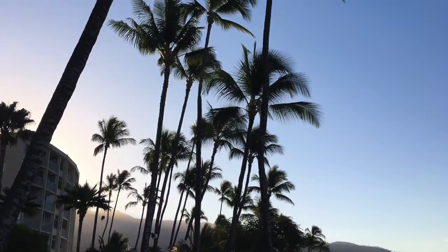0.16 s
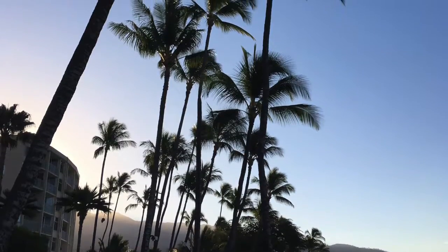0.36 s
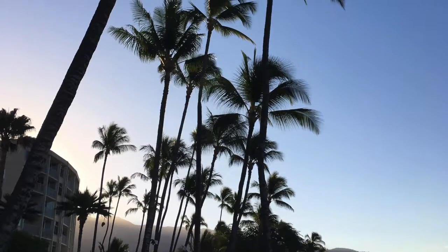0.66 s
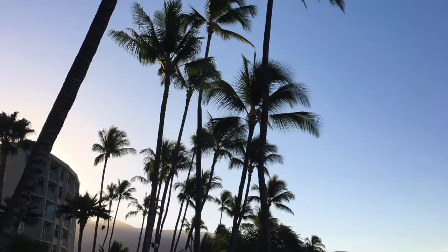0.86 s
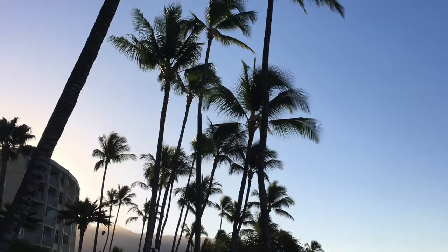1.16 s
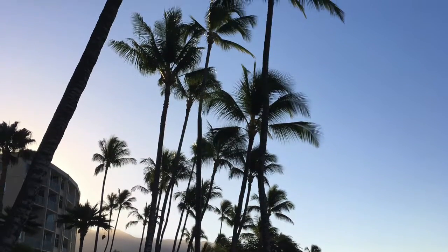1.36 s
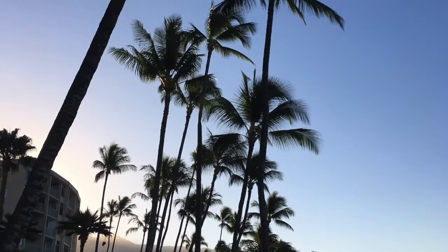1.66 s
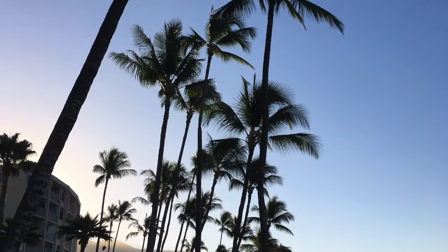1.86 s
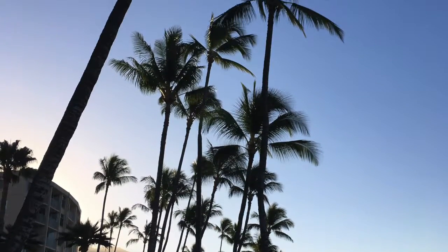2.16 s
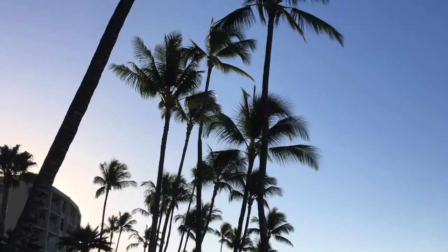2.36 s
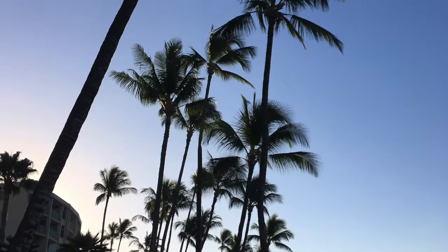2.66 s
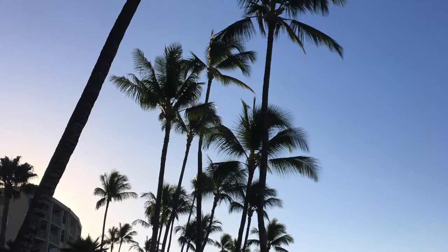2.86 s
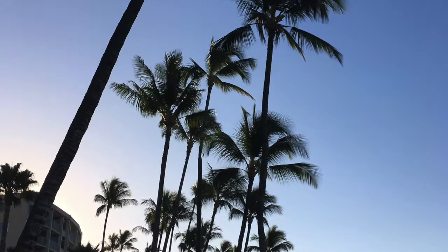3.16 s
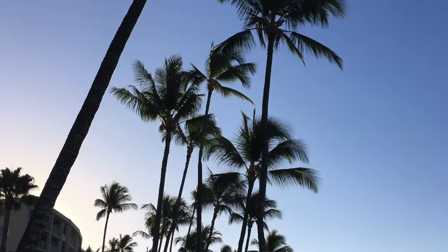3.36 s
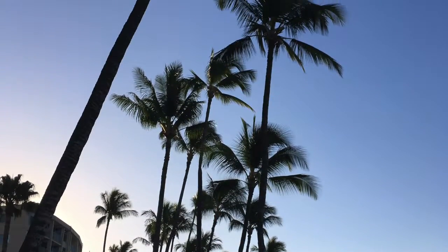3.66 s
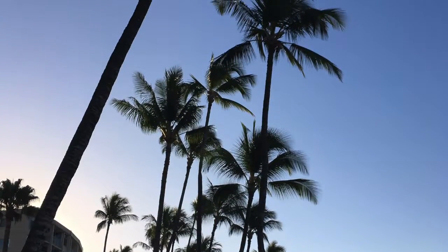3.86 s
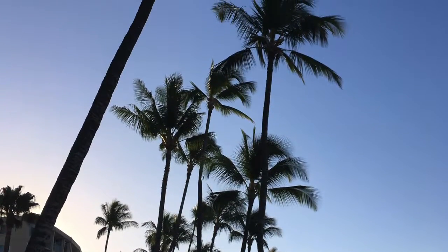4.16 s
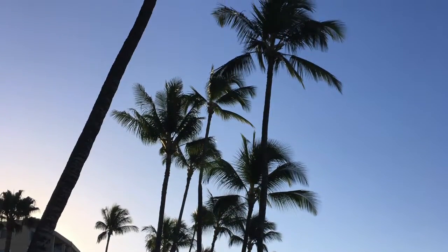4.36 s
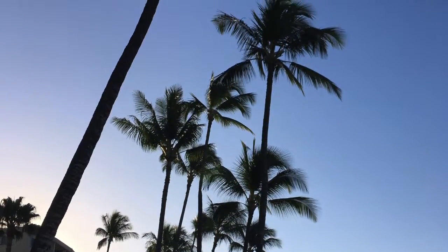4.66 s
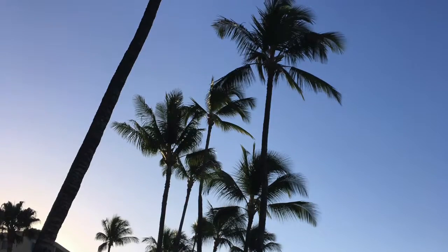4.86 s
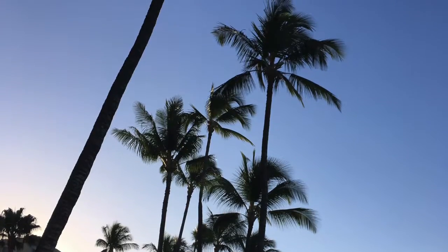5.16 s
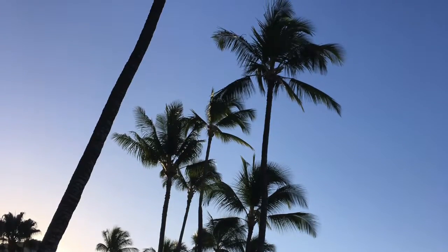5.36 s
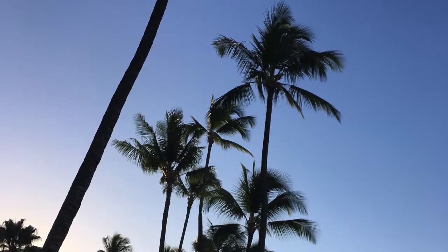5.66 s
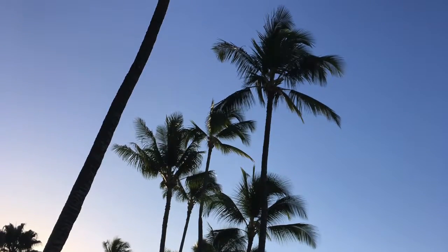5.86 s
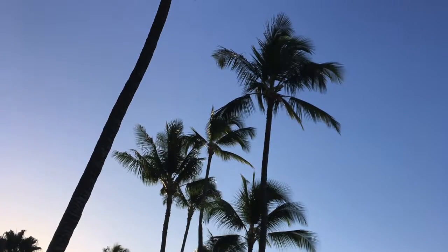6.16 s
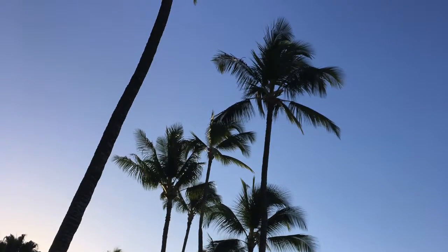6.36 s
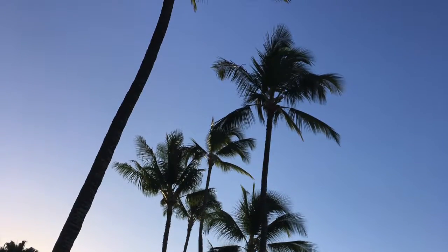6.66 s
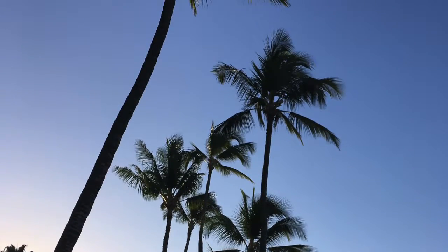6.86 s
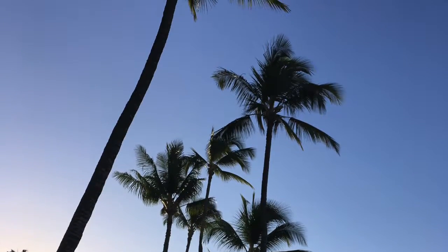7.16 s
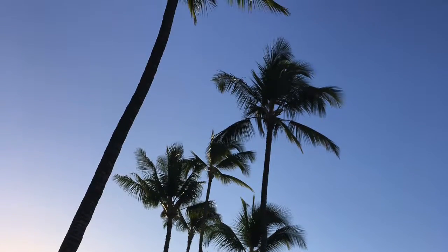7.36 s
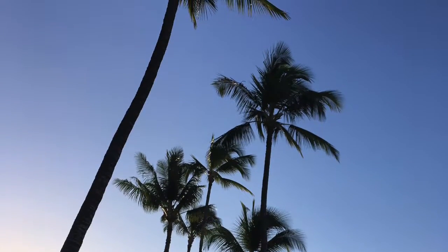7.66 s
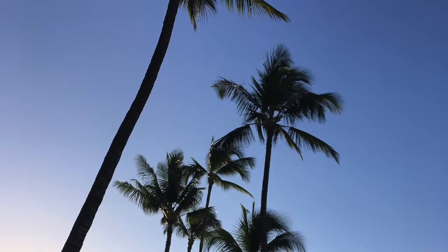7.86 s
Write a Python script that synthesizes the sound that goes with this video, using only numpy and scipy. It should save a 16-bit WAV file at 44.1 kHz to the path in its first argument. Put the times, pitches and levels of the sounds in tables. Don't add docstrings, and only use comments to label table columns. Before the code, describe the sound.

Dense dawn chorus of many small birds chirping, whistling and scolding in overlapping bursts outdoors, over faint low hum and wash, fading out at the end.

```python
import sys
import numpy as np
from scipy import signal
from scipy.io import wavfile
from scipy.ndimage import uniform_filter1d

SR = 44100
rng = np.random.default_rng(int(sys.argv[2]) if len(sys.argv) > 2 else 0)


def field_ratio(decibels):
    return 10 ** (np.asarray(decibels, dtype=float) / 20)


def wav_record(signal):
    frames = np.transpose(np.atleast_2d(signal))
    bounded = np.clip(frames, -1, 1)
    quanta = np.round(bounded * 32767).astype(np.int16)
    wavfile.write(sys.argv[1], SR, quanta)


N = 354123

# t/s, length/s, f/Hz, level/dB
HELD_NOTES = [(.6, 0.086, 2980, -52.5), (6.175, 0.1, 3015, -49.5), (1.44, 0.05, 2980, -53.5),
              (1.67, 0.065, 3560, -58), (3.095, .05, 2880, -54.5), (4.49, .08, 3150, -53.5),
              (1.565, 0.08, 2900, -51.5), (1.64, 0.05, 3450, -59), (1.89, 0.035, 3360, -51),
              (2.135, 0.08, 2960, -49.5), (2.994, 0.053, 3200, -56), (3.331, 0.084, 3206, -48),
              (3.58, 0.04, 3400, -54), (4.105, 0.035, 2835, -58.5), (4.249, .041, 3190, -54.5),
              (4.394, 0.066, 3590, -59), (4.952, .024, 3120, -52), (5.216, 0.11, 3020, -52.5),
              (5.439, 0.072, 2990, -52.5), (5.698, 0.11, 3110, -62), (5.91, 0.068, 3416, -58.5),
              (6.297, 0.032, 3030, -72), (2.835, 0.085, 2900, -49), (6.57, 0.036, 3620, -74),
              (1.257, 0.094, 1587, -70), (1.373, 0.027, 2600, -58), (0.094, 0.063, 1624, -63),
             (1.001, 0.077, 2160, -61.5), (1.764, 0.12, 2685, -58), (3.152, 0.049, 1590, -58),
             (3.223, 0.044, 2560, -58), (3.444, 0.033, 1765, -56), (3.755, 0.082, 2110, -56),
             (3.807, 0.039, 2200, -53), (4.066, 0.045, 2830, -53), (4.062, 0.047, 1760, -57),
             (4.096, 0.058, 2052, -55), (4.205, 0.17, 2045, -55), (4.345, 0.17, 2440, -58.5),
             (4.495, .091, 2060, -56), (4.68, 0.03, 2520, -52), (4.575, .05, 1900, -56),
             (4.951, 0.09, 1417, -67.5), (3.502, 0.085, 2150, -57.5), (4.999, 0.045, 2250, -52),
             (3.97, 0.048, 1877, -57), (5.197, 0.086, 2550, -52), (5.449, 0.076, 2640, -56),
             (5.53, 0.029, 2196, -50.5), (6.454, 0.16, 2320, -68)]
# t/s, length/s, f/Hz, level/dB
SAGS = [(.02, 0.1, 2400, -56), (.02, .04, 2250, -62), (.615, 0.086, 2490, -57), (1.593, .031, 3400, -58),
        (1.793, 0.039, 3395, -55.5), (1.8, 0.04, 3200, -55), (2.075, 0.035, 4180, -55),
        (2.211, 0.099, 2040, -63), (3.062, 0.15, 2850, -55), (3.723, 0.078, 2236, -52),
        (5.468, 0.11, 4550, -74), (6.809, .12, 3570, -66.5), (7.025, 0.092, 2964, -59.5)]
# t/s, length/s, f/Hz, level/dB
DROOPS = [(1.415, .035, 3250, -54), (.649, .088, 1590, -63), (2.703, 0.057, 2720, -61),
          (3.308, .045, 2240, -49), (2.82, .04, 3040, -52), (2.115, .035, 3200, -53),
          (3.66, .04, 1900, -56), (3.91, 0.061, 2163, -55), (4.64, 0.068, 3110, -45),
          (5.276, 0.14, 2070, -58), (6.197, 0.064, 1990, -62.5)]
# t/s, length/s, f/Hz, level/dB
RISES = [
    (.72, .18, 4850, -75),
    (4.203, .06, 5050, -54),
    (3.408, .105, 2480, -59.5),
    (3.624, 0.052, 3590, -56),
    (4.83, 0.045, 2800, -54),
    (4.819, 0.105, 3480, -48.5),
    (6.055, 0.05, 3000, -58.5),
]
# t/s, length/s, f/Hz, level/dB
STEADY_NOTES = [(.053, .03, 2520, -52), (2.672, .07, 3290, -57), (2.672, .06, 1650, -63),
                (2.672, .07, 4950, -68), (2.495, .12, 2290, -58), (3.54, .04, 3210, -47),
                (3.772, .1, 3130, -46.5), (3.87, .11, 3080, -52), (3.998, .06, 3340, -47),
                (4.02, .05, 2720, -45), (4.177, .058, 3120, -50), (4.443, .07, 2600, -48),
                (4.783, .05, 2720, -50), (4.95, .085, 1770, -52), (.075, .035, 5120, -70),
                (2.41, .03, 5900, -66), (3.61, .055, 2060, -49), (.46, .06, 2250, -63),
                (1.825, .075, 2950, -53), (3.14, .04, 4820, -57), (6.57, .05, 3050, -68),
                (6.33, .08, 3000, -66), (7.125, .06, 3620, -67), (2.81, .05, 4200, -62)]
# t/s, length/s, f/Hz, level/dB
PEEPS = [(1.435, 0.11, 4980, -70.5), (2.02, .055, 3900, -53.5), (2.005, .025, 3600, -57),
         (2.41, 0.03, 3860, -55), (3.453, 0.027, 3790, -60), (4.187, .06, 4690, -66.5),
         (4.267, .031, 5100, -64), (4.32, 0.055, 4400, -61), (5.085, 0.125, 4490, -59.5),
         (6.325, .1, 5390, -67.5), (6.416, .07, 3250, -67.5), (2.22, .07, 4180, -61), (2.2, .05, 8400, -72),
         (1.71, .09, 7150, -74), (1.86, .05, 7250, -70),
         (.044, .061, 7520, -77), (0.33, .12, 6480, -71), (0.6, .058, 6160, -71),
           (0.854, 0.11, 6440, -64.5), (1.854, .09, 6610, -71.5), (2.03, 0.055, 5860, -66.5),
           (2.45, 0.035, 6450, -60.5), (2.67, 0.08, 6610, -66), (2.862, 0.078, 5840, -67),
           (3.656, 0.18, 6430, -71), (3.992, 0.046, 6740, -64.5), (4.59, 0.07, 5770, -66),
           (4.66, 0.082, 6130, -68), (4.695, .031, 6500, -64), (5.45, 0.034, 6200, -67.5),
           (5.898, 0.08, 6920, -69.5)]
# t/s, length/s, top f/Hz, low f/Hz, level/dB
HOOKS = [
    (.297, 0.17, 3300, 2200, -51.5),
    (.856, 0.15, 3366, 2133, -50),
    (6.555, .17, 3130, 1884, -66),
]
HOOK_SHAPE = [
    (0, .72),
    (.36, 1),
    (.43, .97),
    (.56, .22),
    (.75, .07),
    (1, 0.0095),
]
# t/s, length/s, top f/Hz, low f/Hz, level/dB
CASCADES = [
    (.966, .295, 4670, 2280, -54.5),
    (3.036, .27, 4653, 2250, -48.5),
    (3.14, .19, 4820, 2500, -55),
]
CASCADE_SHAPE = [
    (0, .96),
    (.13, 1),
    (.22, .9),
    (.43, .46),
    (.7, .16),
    (1, 0),
]
# t/s, length/s, start f/Hz, end f/Hz, level/dB
SLIDES = [(4.79, .06, 2500, 1800, -59), (3.1, .05, 3600, 2850, -53.5), (4.91, .09, 3300, 2200, -51.5),
          (.325, .05, 4600, 4150, -73), (3.9, .09, 3200, 1900, -56.5), (3.65, .12, 3450, 2450, -51),
          (1.793, 0.037, 4270, 3130, -65), (2.1, 0.034, 4390, 3180, -53.5), (2.5, 0.053, 3690, 2300, -56),
          (7.084, .1, 2850, 2100, -63.5)]
# t/s, length/s, start f/Hz, end f/Hz, level/dB
SWOOPS = [(.595, .04, 3100, 2000, -55), (1.44, .07, 2700, 1500, -63), (1.9, .06, 3400, 1800, -57),
          (2.425, .095, 6900, 1900, -50.5), (2.875, .11, 6300, 1400, -52), (2.917, .02, 3800, 1900, -57),
          (3.003, .04, 5600, 3200, -59), (3.34, .105, 6900, 1800, -51.5), (4.4, .06, 4300, 2300, -57),
          (4.65, .06, 3800, 2500, -51.5), (4.92, .08, 3800, 2100, -56), (5.17, .06, 4400, 2600, -60),
          (5.925, .06, 3900, 2000, -59), (6.06, .05, 3000, 1900, -60), (6.16, .03, 3700, 3000, -58),
          (1.63, .06, 3000, 1700, -58), (2.59, .05, 3700, 2300, -57), (2.715, .05, 3300, 2100, -56),
          (3.56, .05, 4800, 2600, -55), (4.28, .06, 2400, 1400, -58), (4.09, .05, 2300, 1400, -62),
          (3.285, .06, 4000, 2700, -54)]
# t/s, length/s, f/Hz, level/dB
RASPS = [(7.338, .07, 3900, -73), (3.558, .1, 5180, -62.5), (3.842, .09, 5220, -61.5),
         (4.585, .1, 5230, -58), (6.135, .05, 4080, -58), (6.828, .1, 5060, -73), (2.755, .09, 4220, -57),
         (2.74, .09, 8300, -69), (3.75, .11, 3950, -61), (.592, .06, 2600, -57), (1.58, .1, 6100, -68),
         (2.57, .1, 7200, -71), (6.105, .08, 4420, -60), (4.5, .07, 2900, -55), (3.02, 0.05, 5350, -62),
         (3.8, .16, 6220, -65.5), (6.815, .05, 3900, -68), (2.07, .07, 3800, -59), (.545, .06, 4550, -72.5),
         (2.575, .05, 3650, -62), (3.59, .09, 4460, -62), (4.54, .06, 4000, -60), (4.26, .06, 4050, -61)]
# t/s, length/s, level/dB, brightness of the upper throat/dB
SCOLDS = [(.586, 0.1, -65.5, 2), (1.442, 0.08, -76, 8.5), (1.58, 0.063, -59, -2.5),
          (1.858, 0.066, -54, -11.5), (2.098, 0.25, -59.5, -10), (2.6, 0.051, -55, -24.5),
          (3.024, .17, -55.5, -8), (3.562, 0.18, -48.5, -13), (3.78, 0.18, -49.5, -9.5),
          (4.184, 0.14, -51, -15), (4.396, 0.06, -52, -13), (4.6, 0.13, -50.5, -8.5),
          (4.85, 0.085, -56.5, -2), (4.46, .1, -62, 0), (5.148, 0.12, -56, -3), (5.444, 0.12, -72.5, 7),
          (5.909, 0.092, -60, -29.5), (6.071, 0.13, -68.5, 3.5), (6.164, 0.048, -58, -5),
          (6.8, 0.09, -60.5, -18)]
# f/Hz, width/Hz, level/dB
THROAT = [(2200, 900, 5.5), (3200, 2000, 11), (4100, 1200, 1.5)]
# f/Hz, width/Hz, level/dB
UPPER_THROAT = [(5780, 550, 7.5), (6500, 860, 8.5), (8000, 3900, -1.5)]
# delay t/s, level/dB
ECHOES = [(.006, -26.5), (.013, -9.5), (.021, -13), (.034, -23.5), (.047, -28.5)]
# f/Hz, t/s
YARD = [(1500, 0.67), (3000, 0.66), (6000, 0.73), (9000, 0.54)]
# t/s, level/dB
FLOCK = [(0, -50.5), (.25, -68.5), (.5, -56.5), (.8, -61.5), (1.1, -53), (1.35, -61), (1.6, -57.5),
         (2.1, -51.5), (2.38, -54.5), (2.7, -53), (3.3, -48.5), (4.45, -49.5), (5, -49), (5.12, -69),
         (5.3, -51), (5.7, -78.5), (6.15, -55), (6.6, -69.5)]
# f/Hz, level/dB
FLOCK_COLOUR = [(710, -41), (1200, -14), (1730, -12), (2310, 3.5), (3050, -1), (3640, -2.5), (4900, -19),
                (6250, -13), (7870, -18.5), (9070, -17.5), (10000, -9), (13000, -81), (22000, -120)]
# f/Hz, level/dB (per Hz)
WASH = [(18, -52), (30, -15), (55, -31), (95, -38), (130, -3), (226, -1.5), (479, -6), (611, -5),
        (859, -13), (1360, -14), (2330, -10.5), (3040, -9), (3690, -19.5), (7840, -30.5), (9070, -39),
        (10000, -37), (13000, -76.5), (22000, -120)]
# f/Hz, width/Hz, level/dB
FANS = [
    (221, 51, -66),
    (298, 8, -72.5),
    (613, 11, -71.5),
    (994.5, 10, -79.5),
    (1238, 1.7, -87),
]


def whistle(length, at, pitches_hz, db, waver=0.015, flutter_db=3.0, husk_db=-11, edge=0.28,
            thin_db_per_khz=-1.0, corners=4, overtone_db=-27, twelfth_db=-33):
    u = np.linspace(0, 1, round(length * SR))
    shake, flutter, husk = (wobble(SR // 2, s)[:len(u)] for s in (.004, .003, .0007))
    rounding = len(u) // round(corners * (len(at) - 2))
    hz = uniform_filter1d(np.interp(u, at, pitches_hz), rounding, mode="nearest")
    phase = 2 * np.pi * np.cumsum(hz * (1 + waver * shake)) / SR
    tone = np.sin(phase) + field_ratio(overtone_db) * np.sin(2 * phase) + field_ratio(twelfth_db) * np.sin(3 * phase)
    thin_db = thin_db_per_khz * (hz - hz.mean()) / 1000
    strength = field_ratio(db + thin_db + flutter_db * flutter) * (1 + field_ratio(husk_db) * husk)
    return strength * np.sqrt(2) * tone * signal.windows.tukey(len(u), edge)


def plain_note(length, start_hz, middle_hz, end_hz, db, **voice):
    return whistle(length, (0, .5, 1), (start_hz, middle_hz, end_hz), db, **voice)


def open_birds():
    out = np.zeros(N)
    kinds = [(HELD_NOTES, 1.005, .97), (SAGS, 1.025, .94), (DROOPS, 1.09, .94), (RISES, .92, 1.02)]
    for notes, start, end in kinds:
        for s, length, hz, db in notes:
            add(out, s, plain_note(length, start * hz, hz, end * hz, db))
    for s, length, hz, db in PEEPS:
        add(out, s, plain_note(length, hz, hz, hz, db, waver=.01, husk_db=-5))
    for s, length, hz, db in STEADY_NOTES:
        add(out, s, plain_note(length, hz, hz, hz, db, waver=.008, flutter_db=2.2, husk_db=-10, edge=.2))
    return out


def hidden_birds():
    out = np.zeros(N)
    for calls, shape in ((HOOKS, HOOK_SHAPE), (CASCADES, CASCADE_SHAPE)):
        at, share = np.transpose(shape)
        for s, length, top_hz, low_hz, db in calls:
            path_hz = low_hz + (top_hz - low_hz) * share
            add(out, s, whistle(length, at, path_hz, db, waver=.011, husk_db=-10, edge=.18,
                                thin_db_per_khz=-0.5, overtone_db=-23, twelfth_db=-31))
    for s, length, start_hz, end_hz, db in SLIDES:
        middle_hz = np.sqrt(start_hz * end_hz)
        add(out, s, plain_note(length, start_hz, middle_hz, end_hz, db, edge=.33))
    return crown(out, direct=44.0, spread_s=.045)


def deep_birds():
    out = np.zeros(N)
    for s, length, hz, db in RASPS:
        add(out, s, plain_note(length, .97 * hz, hz, .97 * hz, db, waver=.018, husk_db=-3))
    for s, length, start_hz, end_hz, db in SWOOPS:
        middle_hz = (start_hz + end_hz) / 2.08
        add(out, s, plain_note(length, start_hz, middle_hz, end_hz, db, waver=.012, flutter_db=1.5,
                               husk_db=-6, edge=.3, thin_db_per_khz=-1.2, corners=16))
    return crown(out, direct=27.0, spread_s=.05)


def scold(length, db, bright_db, pulse_hz=703.6, jitter=.25, breath=0.74):
    count = round(length * SR)
    turns = np.cumsum(pulse_hz * (1 + jitter * wobble(SR // 4, .002)[:count])) / SR
    pulses = np.diff(np.floor(turns), prepend=0)
    drive = evened(pulses - pulses.mean()) + breath * rng.standard_normal(count)
    low = sum(field_ratio(g_db) * resonate_twice(drive, f, w) for f, w, g_db in THROAT)
    high = sum(field_ratio(g_db) * resonate_twice(drive, f, w) for f, w, g_db in UPPER_THROAT)
    voice = evened(low) + field_ratio(bright_db) * evened(high)
    return field_ratio(db) * voice * signal.windows.tukey(count, .85)


def scolding_birds():
    out = np.zeros(N)
    for s, length, db, bright_db in SCOLDS:
        add(out, s, scold(length, db, bright_db))
    return out


def crown(x, direct, spread_s):
    count = round(spread_s * SR)
    taps = rng.standard_normal(count) * np.linspace(1, .4, count)
    taps[0] = direct
    return signal.oaconvolve(x, taps / np.linalg.norm(taps))[:N]


def echoes(x):
    out = x.copy()
    for k, (s, db) in enumerate(ECHOES):
        add(out, s, (-1) ** k * field_ratio(db) * x)
    return out


def yard(x, start_s):
    taps = np.zeros(SR)
    at = np.arange(round(start_s * SR), SR - 20, 20)
    taps[at + rng.integers(0, 20, len(at))] = rng.choice([-1., 1.], len(at))
    hz, t, z = signal.stft(taps, SR, nperseg=256)
    decay = field_ratio(-60 * t / read(YARD, hz)[:, None])
    tail = signal.istft(z * decay, SR, nperseg=256)[1]
    return signal.fftconvolve(x, tail / np.linalg.norm(tail))[:N]


def flock(count=1800):
    out = np.zeros(N)
    for s, pitch, glide, length, loud in rng.random((count, 5)):
        hz = 1400 * 6.8 ** pitch
        t = np.arange(round((.02 + 0.04 * length) * SR)) / SR
        bend = (.5 - 5 * glide) * (t ** 2 - t * t[-1])
        phase = 2 * np.pi * hz * (t + bend)
        level_db = read(FLOCK_COLOUR, hz) + 10 * np.log10(hz) + 9.0 * loud
        add(out, s * N / SR, field_ratio(level_db) * np.sin(phase) * np.hanning(len(t)))
    return out * (1 + 1.2 * wobble(N, 0.00091))


def far_flock():
    chatter = flock()
    far = evened(field_ratio(-6) * chatter + yard(chatter, .01))
    return far * field_ratio(np.interp(np.arange(N) / SR, *np.transpose(FLOCK)) - 2.5)


def fans():
    return sum(field_ratio(db) * evened(resonate_twice(rng.standard_normal(N), hz, w)) for hz, w, db in FANS)


def wash(level_db=-59, patchy_db=1.0):
    frames, hz = N // 256 + 5, np.fft.rfftfreq(1024, 1 / SR)
    a, b, patches = rng.standard_normal((frames, 513, 3)).T
    patches = evened(uniform_filter1d(uniform_filter1d(patches, 8, 0), 14, 1))
    z = (a + 1j * b) * field_ratio(read(WASH, hz)[:, None] + patchy_db * patches)
    noise = signal.istft(z, nperseg=1024, noverlap=768)[1][:N]
    return field_ratio(level_db) * evened(noise)


def evened(x):
    return x / np.sqrt(np.mean(x ** 2) + 1e-20)


def wobble(count, smooth_s):
    size = max(round(smooth_s * SR), 2)
    return evened(uniform_filter1d(uniform_filter1d(rng.standard_normal(count), size), size))


def resonate(x, hz, width):
    turn = np.exp(2j * np.pi * hz * np.arange(len(x)) / SR)
    r = np.exp(-np.pi * width / SR)
    return 2 * (turn * signal.lfilter([1 - r], [1, -r], x / turn)).real


def resonate_twice(x, hz, width):
    return resonate(resonate(x, hz, width), hz, width)


def read(points, hz):
    f, value = np.transpose(points)
    return np.interp(np.log(hz + 1), np.log(f + 1), value)


def add(mix, s, sound):
    part = mix[max(round(s * SR), 0):][:len(sound)]
    part += sound[:len(part)]


def scene():
    near = open_birds() + field_ratio(1) * (hidden_birds() + deep_birds()) + scolding_birds()
    birds = field_ratio(-1.5) * echoes(near) + field_ratio(-8.5) * yard(near, .004) + far_flock()
    return (birds + fans() + wash())[None]


def band_limit(x):
    return signal.sosfilt(signal.butter(12, 10190, fs=SR, output="sos"), x)


def record(dry):
    limited = signal.oaconvolve(dry, signal.firwin(63, 9400, fs=SR)[None], "same")
    limited = signal.sosfilt(signal.butter(2, 95, "high", fs=SR, output="sos"), limited)
    fade_start_s, fade_end_s, fade_power = 6.7, 7.45, .85
    left_s = fade_end_s - np.arange(N) / SR
    fade = np.clip(left_s / (fade_end_s - fade_start_s), 0, 1) ** fade_power
    return band_limit(limited * fade)


dry = scene()
out = record(dry)
wav_record(out)
```